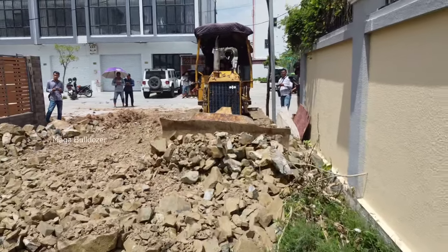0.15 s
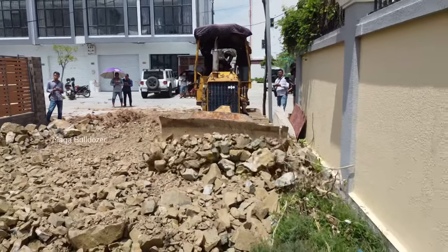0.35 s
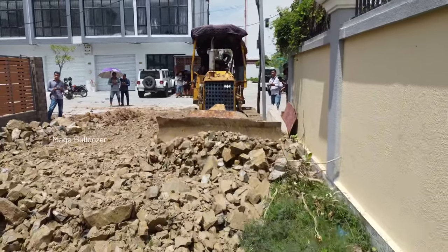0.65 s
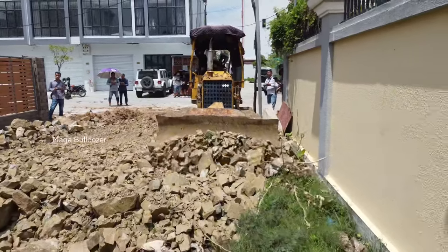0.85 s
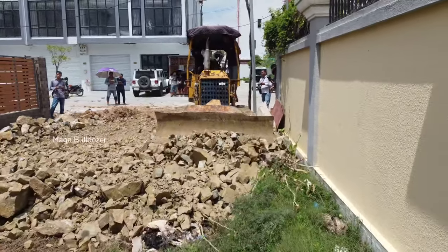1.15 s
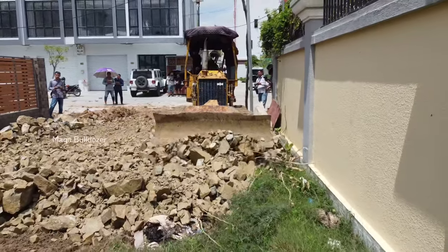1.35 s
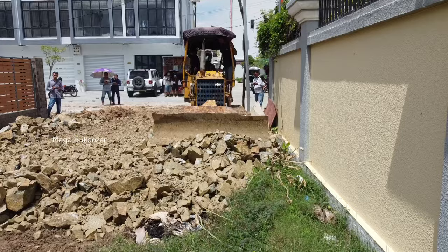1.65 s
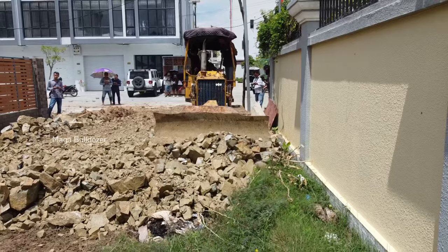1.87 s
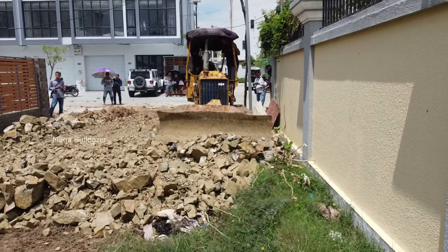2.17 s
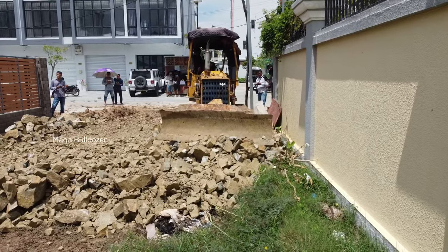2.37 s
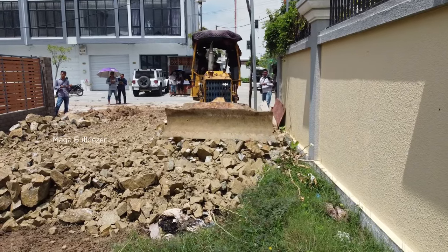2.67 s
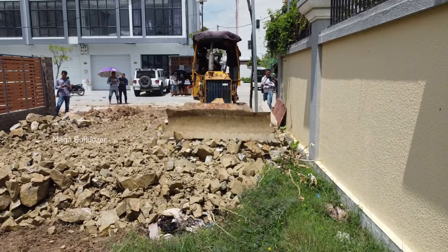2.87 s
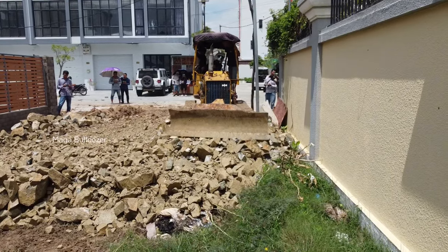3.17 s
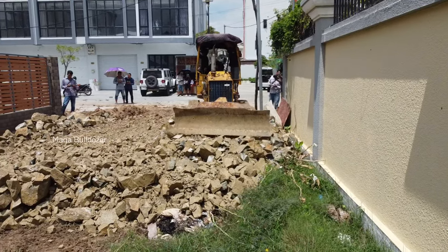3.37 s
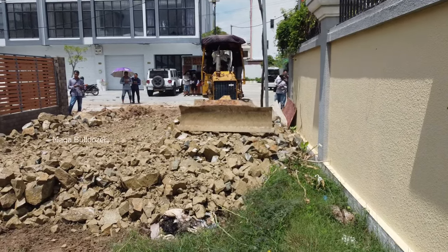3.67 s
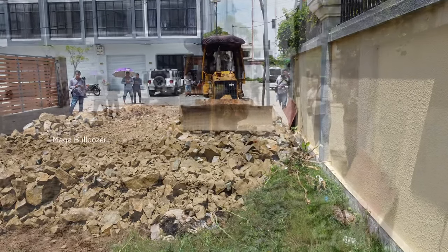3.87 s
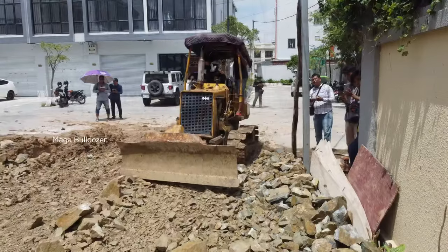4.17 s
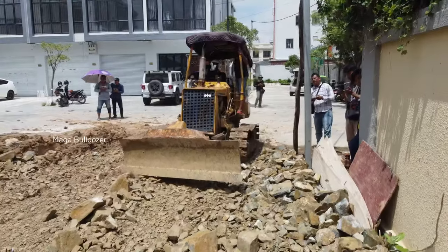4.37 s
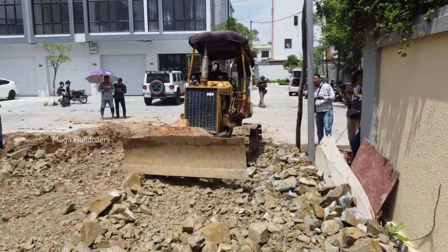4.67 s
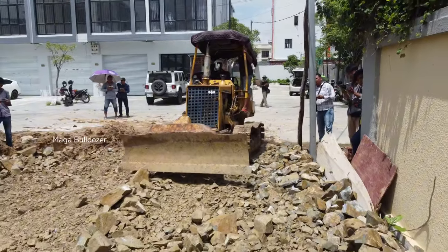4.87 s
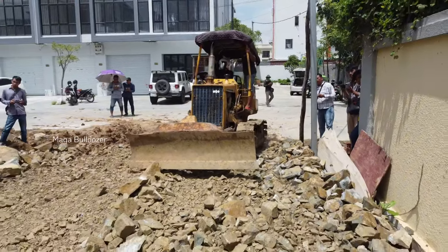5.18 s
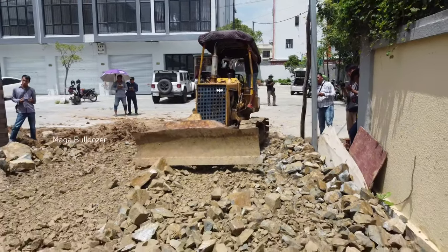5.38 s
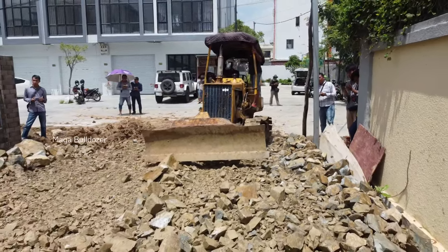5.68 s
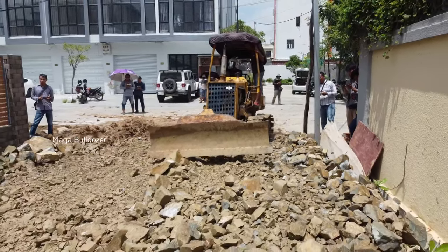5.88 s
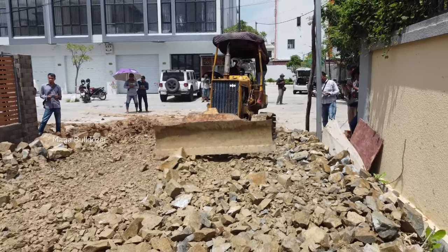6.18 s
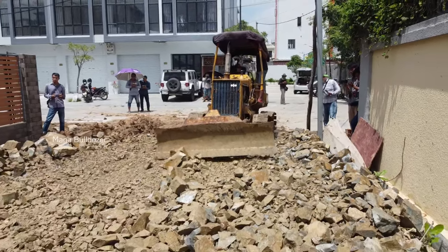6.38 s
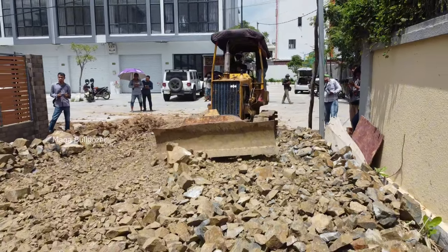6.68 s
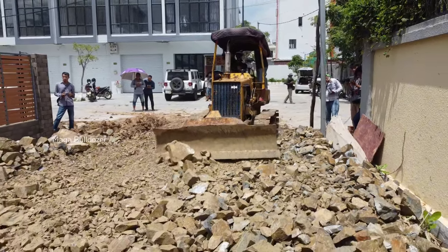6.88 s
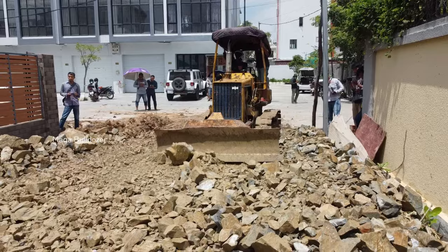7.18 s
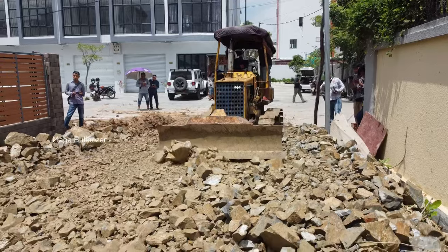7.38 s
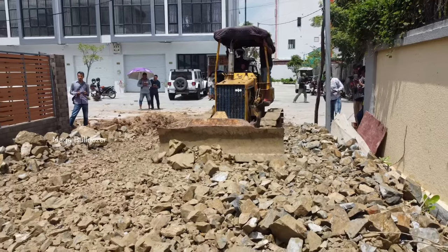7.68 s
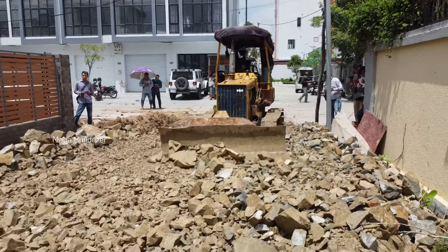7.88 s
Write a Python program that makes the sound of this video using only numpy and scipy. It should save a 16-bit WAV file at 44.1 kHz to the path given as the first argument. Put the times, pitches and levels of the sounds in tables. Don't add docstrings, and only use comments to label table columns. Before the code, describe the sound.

A bulldozer's diesel engine drones steadily outdoors while stones clack on its steel blade, heavy rocks thud and gravel rattles and slides.

```python
import sys
import numpy as np
from scipy import signal
from scipy.fft import rfft, irfft, next_fast_len
from scipy.io import wavfile
from scipy.ndimage import uniform_filter1d

SR = 44100
rng = np.random.default_rng(int(sys.argv[2]) if len(sys.argv) > 2 else 0)


def invert_db(x):
    u = np.asarray(x, float) / 20
    return 10 ** u


def wav_record(signal):
    frames = np.transpose(np.atleast_2d(signal))
    bounded = np.clip(frames, -1, 1)
    quanta = np.round(bounded * 32767).astype(np.int16)
    wavfile.write(sys.argv[1], SR, quanta)


N = 354563
T = np.arange(N) / SR


def evened(x):
    return x / np.sqrt(np.mean(x ** 2) + 1e-20)


def read(points, hz):
    f, value = np.transpose(points)
    return np.interp(np.log(hz + 1), np.log(f + 1), value)


def columns(rows, t):
    start, *rest = np.transpose(rows)
    return [np.interp(t, start, column) for column in rest]


def add(mix, start_s, sound):
    part = mix[round(start_s * SR):][:len(sound)]
    part += sound[:len(part)]


def drift(top_hz, count):
    hz = np.geomspace(top_hz / 20, top_hz, 12)[:, None]
    t = T[::256]
    rows = []
    for _ in range(count):
        wobbles = np.sin(2 * np.pi * (hz * t + rng.random((12, 1)))) / np.sqrt(hz)
        rows.append(np.interp(T, t, evened(wobbles.sum(0))))
    return rows


def swell(t, middle, length, edge):
    return np.sin(np.pi / 2 * np.clip((length / 2 - abs(t - middle)) / edge + .5, 0, 1)) ** 2


def ring(x, hz, width):
    return signal.lfilter(*signal.iirpeak(hz, hz / width, SR), x)


def band(x, order, low_hz, high_hz):
    return signal.lfilter(*signal.butter(order, [low_hz, high_hz], "band", fs=SR), x)


def grains(low_hz, high_hz, cycles, lasting, slope, spread_db, count, size):
    place, pitch, strength = rng.random((count, 3)).T
    hz = (low_hz * (high_hz / low_hz) ** pitch)[:, None]
    khz = hz / 1000
    t = np.arange(size) / SR
    large_db = spread_db * np.minimum(-np.log(strength + 1e-9), 3)[:, None]
    dying = np.exp(-t * hz / (cycles * khz ** lasting))
    knocks = invert_db(large_db) * np.sin(2 * np.pi * hz * t) * dying * khz ** slope
    at = (place * N).astype(int)[:, None] + np.arange(size)
    return evened(np.bincount(at.ravel(), knocks.ravel())[:N])


# time_s, left_lead_ms
LEAD = [
    (0, -0.096),
    (3.5, -0.03),
    (4.1, 0.386),
    (8.04, 0.45),
]


def heard(x, share=1):
    late = share * columns(LEAD, T)[0] / 2000
    return np.array([np.interp(T + late, T, x), np.interp(T - late, T, x)])


# pitch_hz, likeness
ALIKE = [(60, 0.73), (200, 0.9), (350, 0.73), (600, 0.22), (900, 0.057), (1400, 0.077), (3000, 0.37),
         (6000, 0.017), (14000, 0.036)]
# pitch_hz, left_minus_right_db
TILT = [(60, 11), (150, -0.5), (370, -1.5), (930, -2), (2300, 0.3), (5800, -2.5), (14000, -1.5)]
# pitch_hz, likeness, right_lead_rad
FIXED_SIDE = [(1000, 0, 1.2), (1400, .5, 1.6), (1750, .75, 1.5), (2100, .6, 2.0), (2500, .1, 2.4), (5000, 0, 2.7),
              (5500, .45, 2.5), (6200, .5, 0), (6900, .2, -2.0), (7600, .35, -4.5), (8200, .25, -4.4),
              (8700, 0, -4)]


def noise(colour, level_db, patchy_db, flicker_db, size):
    hop = size // 4
    frames, hz = N // hop + 5, np.fft.rfftfreq(size, 1 / SR)[:, None]
    t = np.arange(frames) * hop / SR
    a, b, c, d, patches = rng.standard_normal((frames, len(hz), 5)).T
    patches = uniform_filter1d(patches, size=5, axis=0)
    patches = evened(uniform_filter1d(patches, size=16, axis=1))
    flicker = evened(uniform_filter1d(rng.standard_normal(frames), size=3 * 2048 // size))
    same = np.clip(read(ALIKE, hz), 0, 1)
    lag = np.exp(-2j * np.pi * hz * columns(LEAD, t)[0] / 1000)
    fixed, angle = columns(FIXED_SIDE, hz)
    shared = same * lag + fixed * np.exp(1j * angle)
    shared = shared / np.maximum(abs(shared) / .99, 1)
    left = a + 1j * b
    right = shared * left + np.sqrt(1 - abs(shared) ** 2) * (c + 1j * d)
    z = np.array([left, right])
    tilt_db = read(TILT, hz) / 2
    z *= invert_db(colour(hz) + patchy_db * patches + flicker_db * flicker)
    z *= invert_db(np.array([tilt_db, -tilt_db]))
    z /= np.sqrt(np.mean(abs(z) ** 2))
    z *= invert_db(level_db(hz, t))
    return signal.istft(z, nperseg=size, noverlap=size - hop)[1][:, :N] / size ** .5


# pitch_hz, t60_s
YARD = [(100, 0.098), (1000, 0.32), (8000, 0.068)]


def yard(x):
    taps = np.zeros((2, SR // 2))
    at = np.arange(200, SR // 2 - 20, 20) + rng.integers(0, 20, (2, (SR // 2 - 201) // 20))
    np.put_along_axis(taps, at, rng.choice([-1., 1.], at.shape), 1)
    hz, t, z = signal.stft(taps, SR, nperseg=256)
    dying = invert_db(-60 * t / read(YARD, hz)[:, None])
    tail = signal.istft(z * dying, SR, nperseg=256)[1]
    return signal.fftconvolve(x[None], tail / np.linalg.norm(tail[0]), axes=1)[:, :N]


# time_s, engine_noise_db, stone_db
WORK = [(0, -28, -1), (.32, -27, 0), (.6, -29, -1.5), (1.6, -30, -2), (1.95, -29, 0.5), (2.3, -26, 0),
        (2.7, -27.5, 3), (3.0, -28, -1), (3.3, -29.5, 1), (3.75, -29.5, 0.5), (4.1, -26, 0.5),
        (4.5, -27, 3.5), (5.0, -27.5, 1.5), (5.5, -28.5, -0.5), (5.9, -29.5, -1), (6.9, -30, -3),
        (7.5, -27, -8.5), (8.04, -27, 3.5)]
# pitch_hz, level_db (per Hz)
RUMBLE = [(12, -60), (30, -51), (49, 2), (80, -14.5), (110, 0), (150, -7), (195, -6), (240, -9.5),
          (330, -6.5), (515, -22), (900, -19), (1200, -58), (2000, -120)]


def rumble():
    def level_db(hz, t):
        return columns(WORK, t)[1] - 16.0 + 0 * hz
    return noise(lambda hz: read(RUMBLE, hz), level_db, 1.45, 1.0, size=2048)


# pitch_hz, level_db (per Hz)
ROAR = [(240, -7), (400, -5), (560, -8), (960, -3), (1150, -7), (1850, -6.5), (2700, -16.5), (4300, -23.5),
        (5400, -29.5), (7500, -33), (10500, -37), (13000, -36.5), (15500, -49), (17000, -70)]


def roar(turn):
    def level_db(hz, t):
        mid_db, stone_db = columns(WORK, t)
        treble = np.clip(np.log2(hz / 2200 + 1e-3) / 0.12, 0, 1)
        bright_db = 3.0 - .35 * (mid_db + 27.5) + 0.22 * stone_db
        return mid_db + treble * bright_db + 10.5
    pulse = 1 + .055 * np.cos(turn + 1.2) + .03 * np.cos(turn / 4)
    return pulse * noise(lambda hz: read(ROAR, hz), level_db, 1.57, 0.8, size=1024)


# middle_s, length_s, level_db
SLIDES = [(.16, 0.43, -53), (0.656, .3, -36), (1.91, 0.11, -69.5), (2.233, 0.096, -31), (2.67, 0.23, -26.5),
          (3.113, 0.58, -37), (3.523, 0.12, -38), (3.839, 0.33, -36), (4.2, .4, -48), (4.797, 0.39, -39),
          (5.476, 0.81, -28), (5.793, 0.3, -34), (6.081, 0.3, -43), (6.495, 0.29, -32), (7.058, 0.23, -43),
          (7.805, 0.76, -34.5)]


def gravel():
    stones = grains(344.0, 6900, cycles=3., lasting=0, slope=-.5, spread_db=4., count=4000, size=400)
    links = grains(880, 9000, cycles=20., lasting=.85, slope=-.6, spread_db=2.0, count=1200, size=2500)
    t = T[::64]
    rolling = invert_db(-42.5)
    for middle, length, db in SLIDES:
        rolling = rolling + invert_db(db) * swell(t, middle, length, length / 2)
    return np.interp(T, t, rolling) * stones + invert_db(columns(WORK, T)[0] - 10.0) * links


# middle_s, length_s, level_db, pitch_hz,
# width_hz
PLATES = [(.5, 1.35, -39, 200, 14), (1.8, 2, -34, 201, 14), (2.94, 0.38, -31.5, 192.9, 16),
          (3.9, 1.38, -35.5, 194, 17), (5.0, 0.92, -40, 194, 21), (5.46, .15, -35, 1500, 30),
          (6.17, 0.11, -33, 872, 40), (6.598, 0.69, -35, 263, 61), (5.36, .3, -31, 283, 55),
          (7.45, 0.24, -35, 1290, 55), (7.8, 0.56, -31, 1300, 90), (7.9, 0.45, -30.5, 640, 170),
          (7.95, .2, -45, 1640, 80), (7.825, 0.08, -30.5, 306, 49), (2.695, 0.14, -30.5, 880, 390),
          (2.872, 0.11, -30, 1510, 340), (4.86, 0.11, -30, 380, 98), (5.105, .05, -25, 420, 200),
          (6.2, 0.38, -37, 390, 84), (3.75, .6, -35, 2700, 1200), (7.504, 0.23, -35, 300, 60),
          (6.35, 1.1, -35.5, 186.5, 4.5), (2.36, 0.34, -35, 1080, 300), (2.6, .12, -34.5, 1500, 770),
          (6.2, 1.55, -38.5, 998, 110), (4.5, 0.33, -34.5, 425, 120)]


def plates():
    out = np.zeros(N)
    for middle, length, db, hz, width in PLATES:
        a, b = max(round((middle - length) * SR), 0), round((middle + length) * SR)
        shaking = rng.standard_normal(N)[a:b]
        hum = evened(ring(ring(shaking, hz, width), hz, 2 * width))
        out[a:b] += invert_db(db) * swell(T[a:b], middle, length, length / 3) * hum
    return out


# start_s, peak_db, lowest_hz
TICKS = [(.19, -36, 9100), (.7791, -21, 2200), (.7792, -41, 11000), (1.1448, -30, 12300),
         (2.6459, -38, 9500), (2.6898, -37, 9500), (2.705, -37, 9500), (2.875, -40, 9500),
         (1.3793, -26, 2200), (1.5304, -35, 2200), (2.397, -26, 2200), (4.356, -27, 2200),
         (5.095, -25, 2000), (5.233, -33, 2200), (5.2829, -39, 9500), (5.5867, -28, 2200),
         (5.7009, -40, 9490), (6.2572, -33, 2200), (6.3265, -29, 2202), (7.4339, -30, 2200),
         (7.4714, -26, 2200), (7.6871, -31, 2200)]


def ticks():
    t60_s, octaves = .016, 1.2
    out, t = np.zeros((2, N)), np.arange(0, .03, 1 / SR)
    for start, db, low_hz in TICKS:
        high_hz = min(low_hz * 2 ** octaves, 14300)
        snap = evened(band(rng.standard_normal((2, len(t))), 2, low_hz, high_hz))
        for side, sound in zip(out, snap + .5 * snap[::-1]):
            add(side, start, invert_db(db - 6 - 60 * t / t60_s) * sound)
    return out


# start_s, level_db, pitch_hz, length_s
SQUEAKS = [(0.444, -34.5, 7800, 0.024), (0.55, -36, 2325, 0.22), (0.918, -28, 2410, 0.016),
           (0.985, -38, 1940, 0.31), (0.334, -36, 4300, 0.087), (1.187, -46, 4300, .1),
           (0.76, -24, 1400, 0.022), (0.954, -24, 680, 0.02), (1.226, -40, 2800, .012),
           (1.237, -23, 3390, 0.0085), (1.244, -31, 3410, .011), (1.77, -31, 1360, 0.063),
           (2.595, -46, 4343, .06), (3.616, -31, 7900, 0.02), (4.102, -31.5, 2230, 0.14),
           (4.15, -43, 770, 0.27), (5.281, -45, 7760, 0.039), (5.38, -34, 7860, 0.026),
           (5.401, -39, 2590, 0.19), (5.945, -42, 2409, 0.23), (6.13, -43, 7800, 0.028),
           (6.123, -41, 10330, 0.032), (6.431, -26, 3340, 0.015), (7.298, -46, 1289, 0.71),
           (7.628, -32.5, 1617, 0.54), (7.751, -34, 8110, 0.03), (7.966, -17, 580, 0.031),
           (7.991, -42, 7830, 0.027)]


def squeaks():
    out = np.zeros(N)
    for start, db, hz, length in SQUEAKS:
        n = round(length * SR)
        wobble = evened(uniform_filter1d(rng.standard_normal(SR), size=300))[:n]
        phase = 2 * np.pi * np.cumsum(hz * (1 + 0.0052 * wobble)) / SR
        add(out, start, invert_db(db + 1.0 * wobble) * np.sin(phase) * signal.windows.tukey(n, .5))
    return out


# start_s, peak_db, ring_hz
KNOCKS = [(.024, -9.5, 1000), (0.552, -13, 1050), (.763, -12, 1410), (.772, -12, 1430), (.053, -12, 1030),
          (.084, -9.5, 1470), (0.591, -16, 1380), (.883, -14, 1450), (1.063, -14, 1030), (1.36, -13, 1080),
          (2.088, -12, 1560), (2.201, -11, 1560), (2.251, -8.5, 2620), (2.417, -9.5, 1719),
          (2.545, -14, 3000), (2.551, -15, 1570), (2.552, -4.5, 867), (2.602, -23, 700), (2.632, -15, 650),
          (2.642, -15, 600), (2.694, -5, 760), (2.701, -8, 1000), (2.708, -4.5, 865), (2.617, -10, 710),
          (2.749, -16, 800), (2.828, -5.5, 696), (2.86, -11, 1442), (3.16, -18, 2970), (3.246, -11.5, 1410),
          (3.363, -16, 1337), (3.532, -14, 730), (3.698, -11, 640), (3.866, -14, 1170), (3.911, -14, 1289),
          (4.068, -20, 974), (4.42, -8, 1960), (4.421, -10, 1290), (4.4230, -9, 838), (4.477, -7, 920),
          (4.538, -6.5, 940), (4.586, -12, 1110), (5.009, -16, 1150), (5.204, -14, 1580), (5.25, -10, 1010),
          (5.622, -19, 1530), (7.973, -14, 1590), (7.912, -14, 644)]
# start_s, peak_db, ring_hz, t60_s
CHIPS = [
    (0.189, -21.5, 937, 0.087),
    (.692, -20, 2283, .033),
    (.83, -22, 4970, .027),
    (0.905, -22, 2520, 0.043),
    (2.364, -22, 2014, 0.026),
    (2.682, -14.5, 3200, 0.18),
    (2.7, -19, 1510, 0.14),
    (2.728, -28, 1890, .1),
    (2.714, -32, 4990, 0.079),
    (3.77, -19, 2995, 0.045),
]


def clack(db, hz, t60_s, top_hz, ring_db):
    spread_hz = 1700
    t = np.arange(0, .12, 1 / SR)
    grit = rng.standard_normal(len(t)) * (1 + 0.29 * np.exp(-t / 0.00021))
    crunch = signal.lfilter([1], [1, -.6], band(grit, 3, 600, top_hz))
    apart = band(rng.standard_normal(len(t)), 2, spread_hz, max(top_hz, 1.5 * spread_hz))
    apart = signal.lfilter([1], [1, -.6], apart) / np.std(crunch)
    ringing = evened(ring(grit, hz, hz / 6.)) + np.sin(2 * np.pi * hz * t)
    sound = evened(crunch) + invert_db(ring_db) * ringing
    shape = invert_db(db - 11.5 - 60 * t / max(t60_s, .01)) * (1 - np.exp(-t / (.04 * t60_s)))
    return shape * (sound + apart), shape * (sound - apart)


def clacks():
    hits = [(start, clack(db, hz, .024, 2120 + 0.57 * hz, 1.5)) for start, db, hz in KNOCKS]
    hits += [(start, clack(db, hz, t60_s, 10500, -7)) for start, db, hz, t60_s in CHIPS]
    out = np.zeros((2, N))
    for start, (left, right) in hits:
        add(out[0], start, left)
        add(out[1], start, right)
    return out


# start_s, peak_db, low_pitch_hz, upper_pitch_hz, upper_db
THUDS = [(0.082, -11, 168, 318, -2), (0.187, -6, 192, 240, -1.5), (0.702, -6, 198, 310, -5),
         (0.964, -1, 191, 119, 0.5), (1.36, -9, 130, 380, -1.5), (1.774, -6, 131, 268, -16),
         (1.923, -18, 175, 303, -8), (1.985, -17, 193, 293, -1), (2.133, -5, 198, 337, -17),
         (2.178, -8, 172, 296, -2), (2.402, -13, 151, 300, -10), (2.629, -4, 150, 330, 1),
         (2.635, -5, 111, 199, 1), (2.637, -10, 131, 360, 4.5), (2.69, -4.5, 192, 330, -4),
         (2.825, -13, 189, 374, 2.5), (2.85, -7, 133, 290, -13), (3.032, -13, 188.3, 320, -8),
         (3.098, -14, 188.6, 326, 6), (3.676, -17, 191, 320, -9), (3.835, -14, 202, 320, -11),
         (3.937, -18, 186, 317, -16), (4.021, -8, 184.2, 323, -9), (4.532, -23, 187, 323, -10),
         (4.72, -10, 128, 380, 3), (4.841, -3.5, 145.3, 327, 2.5), (4.868, -13, 174.8, 319, 11.5),
         (5.080, 2.5, 176.5, 294, -2.5), (5.086, -6, 126, 233, -4), (5.469, -13, 179.3, 283, 3)]


def thuds():
    t60_s, rise_s = .062, 0.0069
    out, t = np.zeros(N), np.arange(0, .2, 1 / SR)
    for start, db, hz, upper_hz, upper_db in THUDS:
        body = -np.sin(2 * np.pi * hz * t) - invert_db(upper_db) * np.sin(2 * np.pi * upper_hz * t)
        add(out, start, invert_db(db + 1.5 - 60 * t / t60_s) * body * (1 - np.exp(-t / rise_s)))
    return out


# start_s, length_s, tone_1_db, tone_2_db
LEVER = [(0.4, 0.18, -28.5, -40.5), (0.565, 0.25, -32.5, -38.5), (1.092, 0.18, -28, -51),
         (1.542, 0.13, -35, -58), (2.12, 0.15, -40, -40), (2.549, 0.11, -45, -32), (2.973, .19, -49, -32.5),
         (4.117, 0.24, -37, -33.5), (4.42, 0.52, -34.5, -49), (4.859, 0.19, -47, -36.5),
         (5.256, 0.15, -32, -33.5), (5.414, 0.37, -32.5, -32.5), (5.795, 0.41, -38.5, -29),
         (6.177, 0.42, -32.5, -29), (6.6, 0.42, -30, -29), (7.04, 0.14, -34.5, -35), (7.2, .15, -37, -43),
         (4.98, 0.24, -39, -46)]
# multiple, idle_db (rms), pressed_db (over tone 2)
WHINE = [(3, -48, -18), (4, -47, -21), (5, -47, -11), (6, -50, -20), (7, -50, -28), (8, -53, -40),
         (9, -54, -29), (10, -60, -36), (13, -61, -40)]


def pump(firing):
    teeth_per_firing, valve_s = 11 / 2, 0.1
    t = T[::64]
    pressed = np.zeros((2, len(t)))
    for start, length, *tones_db in LEVER:
        pull = swell(t, start + length / 2, length, valve_s)
        pressed += invert_db(tones_db)[:, None] * pull
    first, second = (np.interp(T, t, p) for p in pressed)
    turn = teeth_per_firing * firing
    waver = drift(20, count=2 + len(WHINE))
    low, upper = np.zeros(N), np.zeros(N)
    for k, size, w in zip((1, 2), (first, second), waver):
        low += size * invert_db(1.3 * w) * np.cos(k * (turn + .1 * w))
    for (k, idle_db, db), w in zip(WHINE, waver[2:]):
        size = invert_db(idle_db) + second * invert_db(db)
        upper += size * invert_db(1.8 * w) * np.cos(k * (turn + .14 * w))
    return np.sqrt(2) * low, np.sqrt(2) * upper


# time_s, firing_hz, load_db (level of order 2)
EXHAUST = [(0, 59.7, -29), (.45, 60.5, -25), (1.1, 60.7, -25.5), (1.45, 60.86, -29), (1.8, 61.07, -26),
           (2.15, 60.4, -25.5), (2.7, 60.04, -24), (3.3, 60.12, -23.5), (3.7, 60.2, -19.5),
           (4.2, 59.1, -19), (4.7, 59.88, -24), (5.12, 59.68, -26), (5.5, 59.25, -18.5),
           (5.85, 62.24, -24.5), (6.99, 62.1, -22.5), (7.11, 59.86, -18.5), (7.45, 57.4, -13.5),
           (8.04, 59.13, -17)]
# first_place_db, second_place_db, load_share, track_strain_share
ORDER_LEVELS = [
    (-21.5, -25, 0.41, -0.19),
    (-25, -24, 0.78, -0.048),
    (-35.5, -34, -0.028, 0.31),
]
# order, level_db (over order 1)
BETWEEN = [(1.25, -28), (1.499, -29), (1.75, -19.5), (2.5, -21.5), (3.25, -13), (3.5, -19.5), (4, -23),
           (4.25, -18), (4.5, -20), (5, -16), (6.5, -23.5)]


def exhaust():
    hz, load_db = columns(EXHAUST, T)
    strain_db = columns(WORK, T)[1]
    extra_db = load_db + 24
    order_db = []
    for first, second, share, strain in ORDER_LEVELS:
        place_db = np.interp(T, (3, 3.36), (first, second))
        order_db.append(place_db + share * extra_db + strain * strain_db)
    turn = 2 * np.pi * np.cumsum(hz) / SR
    loose = np.clip(1 - extra_db / 14, .3, 1.2)
    waver = drift(22, count=3 + len(BETWEEN))
    out = np.zeros(N)
    for k, db, w, phase in zip((1, 2, 3), order_db, waver, (0, 2.6, 1.2)):
        out += invert_db(db + 1.0 * k ** .5 * w * loose) * np.cos(k * turn + phase + 0.37 * w)
    for (k, db), w in zip(BETWEEN, waver[3:]):
        size = invert_db(order_db[0] + db + 0.82 * strain_db + 2.4 * w)
        out += size * np.cos(k * turn + .7 * w + 2 * np.pi * rng.random())
    return np.sqrt(2) * out, turn


def scene():
    pump_side = .55
    drone, turn = exhaust()
    whine, upper = pump(turn)
    hits, loose = clacks(), gravel()
    direct = heard(drone + thuds()) * invert_db(np.array([[.5], [-.5]]))
    direct = direct + hits + heard(squeaks() + loose + upper) + heard(whine, pump_side)
    to_yard = invert_db(-9.0) * hits[0] + invert_db(-4.0) * loose + invert_db(-15.0) * whine
    thin = signal.lfilter(*signal.butter(2, 600, "high", fs=SR), to_yard)
    return direct + yard(thin) + rumble() + roar(turn) + heard(plates(), pump_side) + ticks()


def roll_off(x):
    return signal.sosfilt(signal.butter(12, 15700, fs=SR, output="sos"), x)


# pitch_hz, depth
WIDENING = [(2000, 0.16), (5000, 0.15), (8000, 0), (9700, 0.64), (10500, 1), (12000, 1), (13800, 1),
            (14600, 0.96)]


def record(dry):
    widening_ms, mic_low_hz = 0.2945, 46
    size = next_fast_len(N)
    hz = np.fft.rfftfreq(size, 1 / SR)
    comb = np.clip(read(WIDENING, hz), 0, .99) * np.cos(2 * np.pi * hz * widening_ms / 1000)
    dry = signal.sosfilt(signal.butter(4, mic_low_hz, "high", fs=SR, output="sos"), dry)
    mid = irfft(rfft(dry[0] + dry[1], size) * np.sqrt(1 + comb), size)[:N] / 2
    side = irfft(rfft(dry[0] - dry[1], size) * np.sqrt(1 - comb), size)[:N] / 2
    both = np.array([mid + side, mid - side])
    limited = both / (1 + both ** 10) ** (1 / 10)
    return roll_off(limited)


dry = scene()
out = record(dry)
wav_record(out)
```